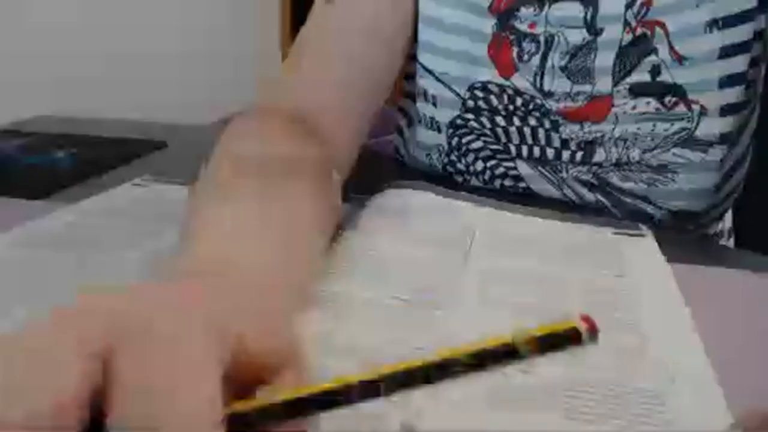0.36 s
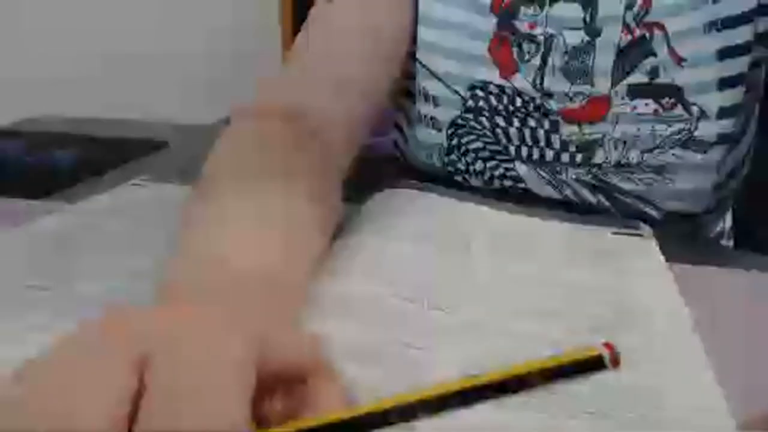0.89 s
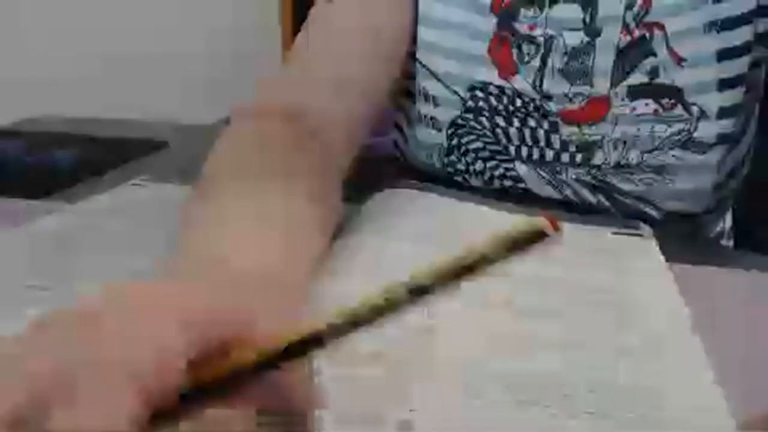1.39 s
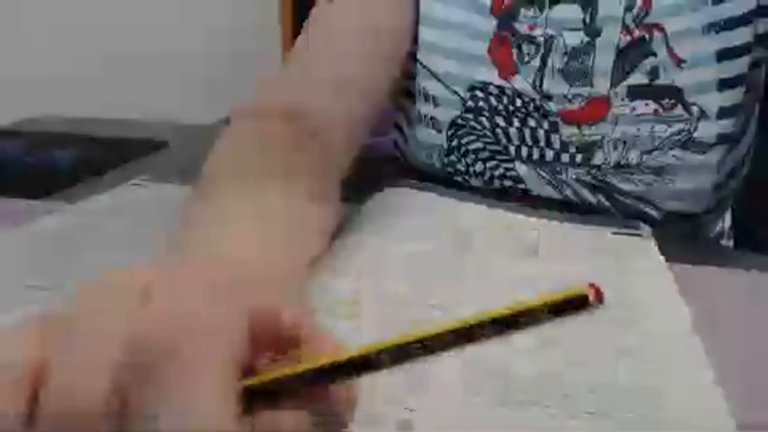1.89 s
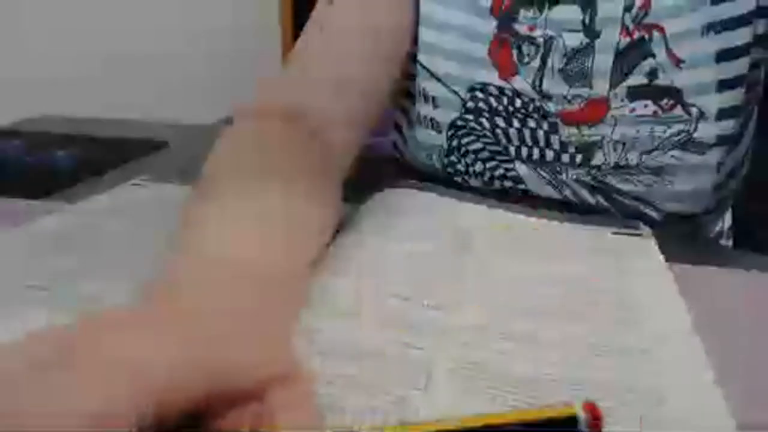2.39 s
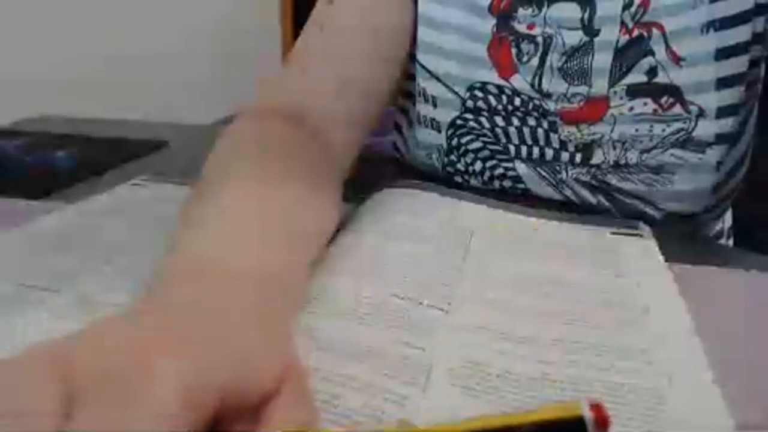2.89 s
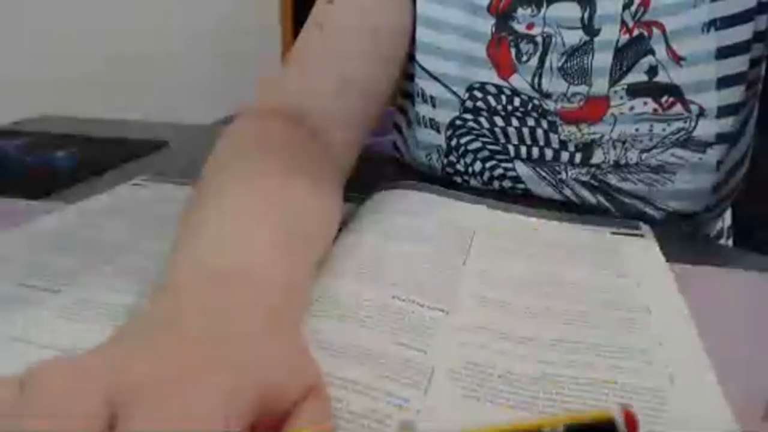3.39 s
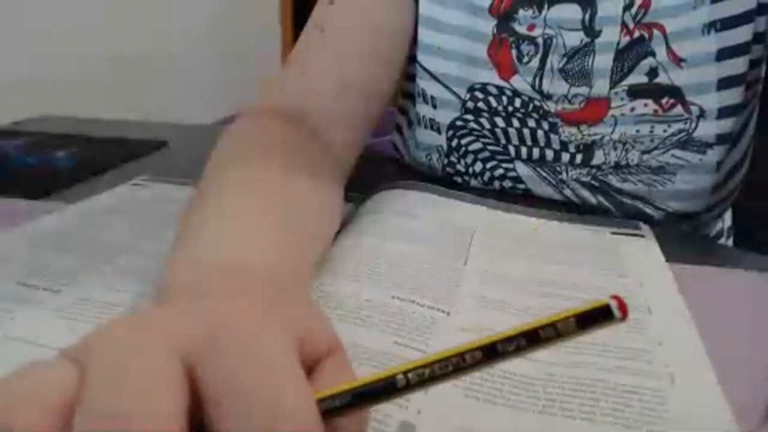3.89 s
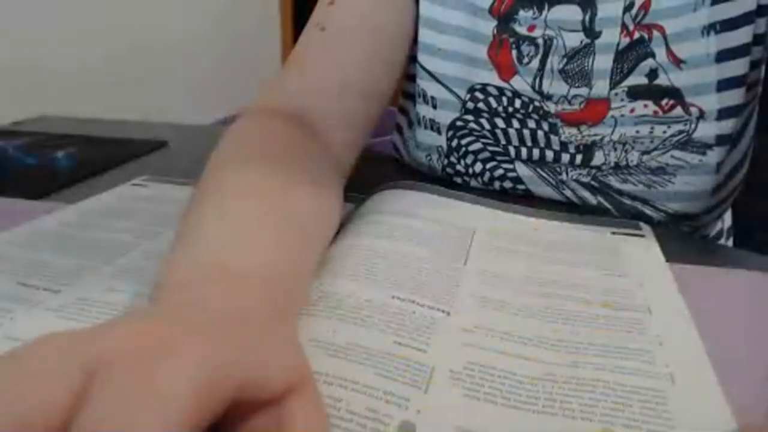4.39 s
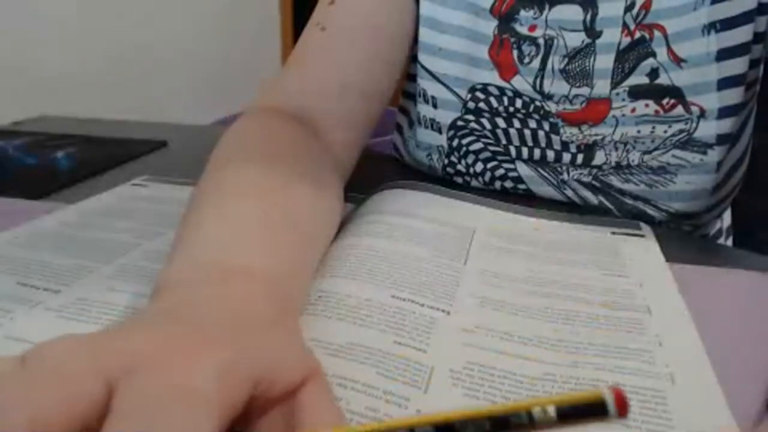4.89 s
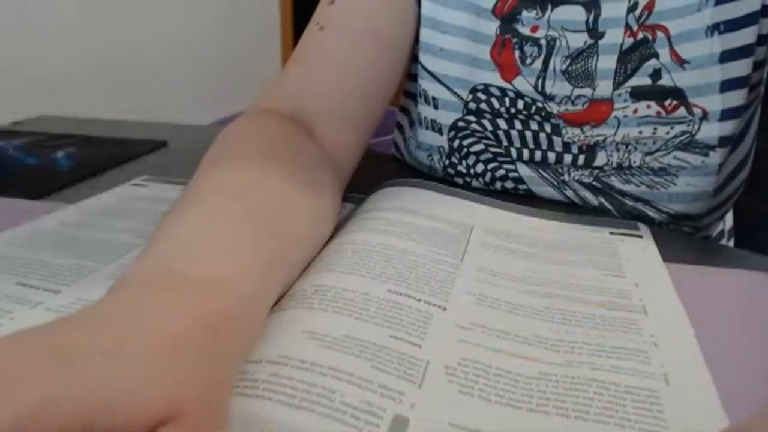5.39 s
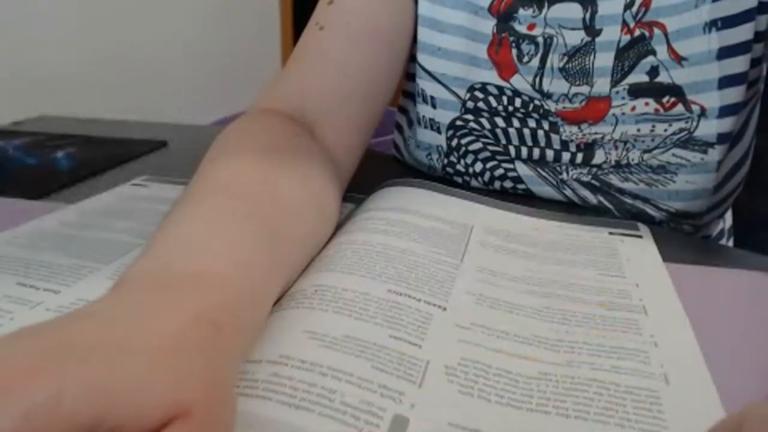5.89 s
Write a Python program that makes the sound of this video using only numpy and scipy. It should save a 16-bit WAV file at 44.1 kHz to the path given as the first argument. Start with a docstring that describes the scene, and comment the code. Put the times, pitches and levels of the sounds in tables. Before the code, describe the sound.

Quick bursts of hard plasticky clicks and rattles close to the microphone, dull desk thuds beneath, one brief dropout, then faint light ticks.

```python
"""A hand holding a pencil taps plastic keys in quick bursts, close to a small microphone on the same desk.
Each stroke is a cluster of clicks into the key body; the desk top booms, loose caps rustle, a small room answers.
At about 3 s the sound drops out for a moment and snaps back; a last strong burst follows.
Near 4.6 s a fingertip slides over a page with hiss and squeak; a faint thin whistle comes and goes.
The last keys are lighter. The desk hum of a resting arm and soft room hiss lie underneath."""
import sys
import numpy as np
from scipy import signal
from scipy.fft import rfft, irfft
from scipy.io import wavfile
from scipy.ndimage import uniform_filter1d

SR = 44100
rng = np.random.default_rng(int(sys.argv[2]) if len(sys.argv) > 2 else 0)


def linear_from_db(decibels):
    """Turn decibels (scalar or array-like) into linear amplitude factors; 0 gives 1."""
    return 10 ** (np.asarray(decibels, float) / 20)


def wav_out(sig):
    """Save sig, one row per channel (or a flat mono array), as 16-bit PCM at SR to the path in sys.argv[1]."""
    wavfile.write(sys.argv[1], SR, np.round(np.clip(np.atleast_2d(sig).T, -1, 1) * 32767).astype(np.int16))


N = 265482

# loose caps shaken by a stroke: start_s, level_db, t60_s (time to fall 60 dB),
# ring_hz (of the struck part), tilt_db_per_octave (brightness)
SHAKES = [(0.582, -41.5, 0.21, 3530, -1), (0.691, -49.5, 0.19, 2670, 1), (.791, -41.5, 0.32, 1150, 1.5),
          (.875, -52.5, 1.1, 2970, -2.5), (0.967, -38, 0.12, 1010, -4.5), (1.062, -35, 0.31, 1140, 3.5),
          (1.194, -57, 0.89, 1085, 3), (1.239, -42.5, .47, 940, -0.5), (1.335, -39.5, 0.43, 3080, -1),
          (1.415, -50, .74, 2770, -0.5), (1.497, -60, .22, 2920, -3), (1.606, -46.5, 0.42, 844, 0),
          (1.726, -32, .3, 1400, 1), (1.796, -41.5, 0.74, 2360, 3), (1.864, -39.5, .17, 1290, 1.5),
          (2.062, -34.5, .33, 2890, -0.5), (2.232, -31.5, 0.31, 1095, 1.5), (2.33, -41.5, .47, 2020, 2.5),
          (2.409, -30.5, 0.2, 2603, 0), (2.483, -41.5, 1, 2660, 0.5), (2.574, -35, 0.45, 2210, 0.5),
          (2.631, -37, .28, 3010, 1), (2.672, -42, .19, 3200, -1), (2.817, -32, .21, 3120, -0.5),
          (2.889, -51, 0.5, 1840, 2.5), (2.983, -34.5, 0.14, 1600, 1.5), (3.121, -59.5, 0.22, 3140, -2),
          (3.343, -55.5, 0.93, 2810, 0), (3.382, -58.5, 0.35, 1070, -0.5), (3.431, -61, 0.82, 1290, 0.5),
          (3.52, -45.5, .11, 1660, 0), (3.635, -34, 0.3, 1750, 1), (3.776, -46, 0.25, 3100, 4.5),
          (3.832, -52.5, 0.35, 2640, -5), (3.933, -35, 0.25, 1744, -0.5), (3.999, -39.5, .096, 3220, 1),
          (4.035, -46.5, 0.24, 2930, 0), (4.135, -77, .8, 1015, 3), (4.171, -38, 0.28, 2800, 0.5),
          (4.295, -42.5, 0.31, 1030, 0), (4.374, -52.5, .8, 1095, 0), (4.431, -63, 0.15, 1250, 5.5),
          (4.792, -62.5, 0.25, 1290, 2.5), (4.857, -64.5, 0.28, 1000, -1), (4.95, -72, .64, 1120, 1.5),
          (5.001, -56, 0.11, 1090, 15), (5.09, -60, 0.33, 976, 4.5), (5.129, -56.5, 0.19, 1160, 5),
          (5.252, -76, .3, 1110, 4.5), (5.366, -68, .54, 980, 1), (5.449, -54.5, 0.26, 3830, 8),
          (5.545, -61.5, 0.21, 1100, 1), (5.623, -60, 0.49, 1115, 3), (5.684, -52.5, .15, 1087, 6.5),
          (5.947, -57.5, 0.13, 1214, 0.5)]


def rms_one(x):
    """Scale to rms 1."""
    return x / np.sqrt(np.mean(x ** 2) + 1e-20)


def in_time(rows):
    """Columns of a table that starts with the time, drawn as straight lines sample by sample."""
    s, *columns = np.transpose(rows)
    return [np.interp(np.arange(N) / SR, s, c) for c in columns]


def resonate(x, hz, width_hz):
    """Two-pole resonance, like one mode of a struck body, with gain 1 on top."""
    r = np.exp(-np.pi * width_hz / SR)
    feedback = [1, -2 * r * np.cos(2 * np.pi * hz / SR), r * r]
    return signal.lfilter([(1 - r * r) / 2, 0, (r * r - 1) / 2], feedback, x + 1e-18)


def narrow_noise(hz, width_hz):
    """Noise twice through one resonance: a husky, unsteady pitch."""
    return rms_one(resonate(resonate(rng.standard_normal(N), hz, width_hz), hz, width_hz))


def coloured(x, spectrum, tilt_db=0):
    """Third-octave bank that gives two rows of noise a spectrum; the tilt (dB per octave) turns about 2 kHz."""
    hz_points, db_points = np.transpose(spectrum)
    edges = 25 * 2 ** np.arange(0, 8.7, 1 / 3)
    out = 0
    for k, (low, high) in enumerate(zip(edges, edges[1:])):
        hz = np.sqrt(low * high)
        band_filter = signal.butter(2, [low, high], "band", fs=SR, output="sos")
        band = signal.sosfilt(band_filter, x[k % 2])      # neighbouring bands use different rows
        band_db = np.interp(np.log(hz), np.log(hz_points), db_points)
        out = out + band * linear_from_db(band_db + tilt_db * np.log2(hz / 2000))
    return out


def room_hiss():
    """Steady noise of the room, shaped by a fixed spectrum."""
    # pitch_hz, level_db (per Hz, before the whole is scaled)
    hiss_spectrum = [(15, -39), (25, -6), (48, 2), (168, -3), (204, -1), (254, -11), (316, 4), (357, -6.5),
                     (540, -15), (1400, -19.5), (2700, -30.5), (4190, -30), (8500, -40), (11000, -76),
                     (18700, -120)]
    level_db = -68
    return linear_from_db(level_db) * rms_one(coloured(rng.standard_normal((2, N)), hiss_spectrum))


def desk():
    """Each low mode is a narrow wavering tone that builds up to every blow and dies away to the hum of the arm."""
    # blows through the desk top: fullest_s, first_mode_db, second_mode_db, third_mode_db,
    # t60_s (until the hand damps it)
    blows = [(0.629, -38, -37.5, -54.5, 0.13), (.755, -50, -55.5, -61, .2), (.856, -43, -37, -46.5, 0.27),
             (.915, -54, -36, -43, 0.11), (.97, -53, -44, -52, .2), (1.04, -53.5, -51.5, -60.5, .15),
             (1.098, -38.5, -37, -42.5, 0.086), (1.155, -45.5, -61, -64.5, 0.061),
             (1.24, -70.5, -62.5, -62.5, .15), (1.311, -50.5, -37, -56.5, 0.24),
             (1.374, -50, -39, -51.5, 0.21), (1.445, -53, -36.5, -61, 0.11), (1.679, -56, -45.5, -55, 0.17),
             (1.772, -42.5, -34, -42, 0.16), (1.84, -42.5, -44, -52, 0.2), (1.904, -48.5, -43, -55.5, 0.11),
             (1.971, -53.5, -55, -63.5, 0.18), (2.102, -44.5, -25.5, -40, 0.23),
             (2.2, -52.5, -44.5, -63, 0.26), (2.278, -36, -32.5, -45.5, 0.17),
             (2.364, -38.5, -38.5, -51.5, .15), (2.445, -47, -25, -42, 0.18),
             (2.515, -51.5, -36.5, -48, 0.15), (2.593, -42, -28, -41.5, 0.1), (2.615, -36.5, -43, -37, 0.1),
             (2.66, -40, -52.5, -50.5, .15), (2.734, -54.5, -40, -54, 0.067),
             (2.836, -56.5, -39, -47, 0.23), (2.876, -34.5, -42.5, -44, 0.11),
             (2.93, -43, -50.5, -57.5, 0.098), (3.0, -59, -54.5, -53.5, 0.14), (3.14, -66, -49.5, -64, .15),
             (3.404, -57, -42, -53, 0.36), (3.56, -54.5, -61, -58, 0.17),
             (3.662, -45.5, -42.5, -41.5, 0.078), (3.73, -59.5, -56.5, -51, .2),
             (3.845, -48, -47, -51.5, .15), (3.905, -47.5, -39, -50.5, 0.21),
             (3.973, -40, -38.5, -36, 0.14), (4.044, -52, -38, -44, 0.1), (4.115, -64, -52, -55.5, 0.067),
             (4.21, -50, -33, -47.5, 0.16), (4.361, -58, -35, -42.5, 0.14),
             (4.472, -47.5, -43.5, -62, 0.19), (4.87, -58.5, -63, -67.5, 0.37), (5.04, -61, -59, -71, 0.13),
             (4.915, -61, -65, -60, 0.13), (5.151, -58, -60, -60, 0.22), (5.294, -68, -62, -70.5, 0.22),
             (5.57, -66, -67, -60.5, 0.17), (5.85, -72, -84, -63.5, 0.43), (6.02, -69, -46.5, -62.5, 0.21)]
    # modes of the desk top: pitch_hz, width_hz (of each of two passes)
    desk_modes = [(61, 16), (118.5, 7), (195, 51)]
    # build-up of each mode: rise_db_per_s
    rises = [398.5, 547, 449.5]
    # how long each mode stays at full swing: hold_s
    holds = [0.01, 0.014, 0.0053]
    # hum kept up by the resting arm: time_s, first_mode_db
    arm = [(0, -67), (.55, -80), (.9, -68.5), (3, -65.5), (3.3, -60.5), (4.6, -60.5), (5.2, -67),
           (5.4, -70.5), (5.7, -65), (6.02, -64)]
    # second and third mode of that hum against the first: level_db
    arm_upper = [-14.5, -15.5]

    s, *peak_db, t60 = np.transpose(blows)[:, :, None]
    steps = np.arange(0, N + 64, 64) / SR
    arm_db = in_time(arm)[0]
    out = 0
    settings = zip(desk_modes, peak_db, rises, holds, [0, *arm_upper])
    for (hz, width_hz), top_db, rise, hold, lower_db in settings:
        before = np.minimum(steps - s + hold / 2, 0)
        after = np.maximum(steps - s - hold / 2, 0)
        swing_db = top_db + rise * before - 60 * after / np.maximum(t60, 0.03)
        blow_power = np.sum(linear_from_db(2 * swing_db), axis=0)
        power = np.interp(np.arange(N) / SR, steps, blow_power) + linear_from_db(2 * (arm_db + lower_db))
        noise = rng.standard_normal(N + SR)      # one second extra to settle
        tone = resonate(resonate(noise, hz, width_hz), hz, width_hz)
        steady_tone = np.cos(np.angle(signal.hilbert(tone)))[SR:]      # keeps the phase, evens out the level
        out = out + np.sqrt(2 * power) * steady_tone
    return out


def whistle():
    """A faint thin whistle of narrow noise that comes and goes."""
    # time_s, level_db
    whistle_level = [(4.74, -100), (4.77, -70), (4.81, -89.5), (4.89, -87), (4.92, -84.5), (4.95, -73),
                     (4.99, -100)]
    return linear_from_db(in_time(whistle_level)[0]) * narrow_noise(hz=3450, width_hz=120)


def slide():
    """A fingertip on the page: smooth friction hiss with a husky squeak on two resonances."""
    # time_s, hiss_db, squeak_db
    slide_level = [(4.56, -94, -97.5), (4.6, -79, -70.5), (4.66, -64, -72), (4.72, -72.5, -83),
                   (4.8, -99.5, -96)]
    # pitch_hz, level_db (per Hz, before the hiss is scaled)
    hiss_spectrum = [(350, -44), (600, -15.5), (1280, -4.5), (2000, -17), (2430, -8.5), (5970, -13),
                     (8000, -30), (10400, -55), (17600, -120)]
    # pitch_hz, width_hz (of each of two passes), level_db (within the squeak)
    squeak_modes = [(2310, 92, 4.5), (7200, 350, -6)]

    hiss_db, squeak_db = in_time(slide_level)
    hiss = rms_one(coloured(rng.standard_normal((2, N)), hiss_spectrum))
    squeak = sum(linear_from_db(db) * narrow_noise(hz, width_hz) for hz, width_hz, db in squeak_modes)
    return linear_from_db(hiss_db) * hiss + linear_from_db(squeak_db) * squeak


def shake_db(t):
    """Rustle level, which starts afresh at each stroke and dies away; also the index of that stroke."""
    s, start_db, t60, *_ = np.transpose(SHAKES)
    last = np.clip(np.searchsorted(s, t) - 1, 0, None)
    dying_db = start_db[last] - 60 * (t - s[last]) / np.maximum(t60[last], 0.05)
    return np.where(t > s[0], dying_db, -200), last


def rustle():
    """Dense small ticks: each stroke shakes the loose caps afresh; they grow duller and die away until the next."""
    # pitch_hz, level_db (per Hz, before the whole is scaled)
    rustle_spectrum = [(150, -35.5), (250, -4), (302, -4), (597, 3), (710, -10), (1100, 2), (1550, -7.5),
                       (1750, -2), (3120, -11), (6920, -29), (8000, -46.5), (10400, -75.5), (17600, -120)]
    grains_per_s, spread_db = 13000.0, 6.0
    flicker_db, flicker_hz = -0.5, 60.0
    swell_ms, darken_db_per_octave_s = 2.4, -9.5
    ring_db, ring_width_hz = -7.5, 57.0      # ring of the struck part against the rustle

    s, *_, ring_hz, tilt_db = np.transpose(SHAKES)
    t = np.arange(N) / SR
    level_db, last = shake_db(t)
    age = np.clip(t - s[last], 0, 0.3)      # the darkening stops after 0.3 s
    swell = 1000 / (swell_ms * SR)
    level = signal.lfilter([swell], [1, swell - 1], linear_from_db(level_db))      # softens each start

    sizes = linear_from_db(spread_db * np.minimum(rng.exponential(1, (2, N)), 3)) * rng.choice([-1, 1], (2, N))
    ticks = (rng.random((2, N)) < grains_per_s / SR) * sizes
    slow_filter = signal.butter(2, flicker_hz, fs=SR, output="sos")
    clumps = rms_one(signal.sosfilt(slow_filter, rng.standard_normal(N)))

    plain = np.sqrt(np.mean(coloured(ticks, rustle_spectrum) ** 2))
    sound = coloured(ticks, rustle_spectrum, tilt_db[last] + darken_db_per_octave_s * age) / plain
    for k in range(len(s)):      # the part that was struck keeps sounding its own resonance
        now = last == k
        sound[now] += linear_from_db(ring_db) * rms_one(resonate(ticks[0, now], ring_hz[k], ring_width_hz))
    return level * linear_from_db(flicker_db * clumps) * sound


def strays():
    """Stray ticks: small contacts at random moments, as strong as the caps are shaken just then."""
    # over the rustle, for clack, case ring and snap: level_db
    over_rustle = [6.5, 8.5, -4.5]
    ticks_per_s, spread_db, length_ms = 14, 3.5, 1.5
    count = int(ticks_per_s * N / SR)
    s = (np.arange(count) + rng.random(count)) / ticks_per_s
    chance_db = spread_db * rng.standard_normal((count, 3))
    level_db = shake_db(s)[0][:, None] + over_rustle + chance_db
    return np.column_stack([s, level_db, np.full(count, length_ms)])


def keys():
    """A contact is a sudden, short burst of tiny impacts; every contact draws its own tuning and mode strengths."""
    # key contacts: start_s, clack_db, case_ring_db, snap_db, length_ms (kept within 0.5 to 15 below)
    contacts = [(0.5815, -19, -27, -26, 7.4), (0.7046, -39.5, -40, -70, 11),
                (0.7916, -20.5, -25, -19.5, 3.8), (0.8245, -33, -32, -40, 1),
                (0.9112, -36, -39, -43.5, 0.62), (0.9383, -38.5, -46, -50, 8.5),
                (0.9682, -24.5, -17.5, -30, 2.2), (1.061, -13.5, -19, -26, 8),
                (1.0833, -24, -29, -36, 0.55), (1.1938, -45.5, -45.5, -71, 1.4), (1.2382, -16, -19, -27, 2),
                (1.2871, -35, -41.5, -55.5, 1.4), (1.3355, -17.5, -16.5, -25.5, 3.9),
                (1.388, -32.5, -40, -60, 1.4), (1.4138, -30, -31, -49, 1.3), (1.4484, -46, -36.5, -62, 1.5),
                (1.4698, -40.5, -34, -62, 2.2), (1.4968, -34, -43, -62.5, 7.4),
                (1.6048, -25.5, -24.5, -37, 1.5), (1.6427, -29.5, -29, -38.5, 7.1),
                (1.728, -17.5, -24, -23, .73), (1.7331, -18.5, -13.5, -22.5, 4.1),
                (1.7584, -30.5, -28.5, -41, 3.5), (1.7956, -33.5, -29.5, -42, 10.4),
                (1.8205, -30, -33.5, -45.5, 7.6), (1.8617, -28.5, -28, -62, 1.8),
                (1.8762, -24.5, -28, -51, 9.7), (2.0607, -10.5, -10, -15.5, 5.7),
                (2.2291, -13, -23.5, -24.5, 2.8), (2.2333, -17, -16.5, -45, 4),
                (2.3302, -21.5, -27, -36, 0.63), (2.339, -17.5, -23, -32.5, 1.1),
                (2.4114, -10.5, -26.5, -40, 2.5), (2.4832, -19.5, -28, -27, 3.2),
                (2.4894, -19, -19.5, -33.5, 2.6), (2.5167, -34, -37, -49.5, 7.9),
                (2.5743, -12, -21, -26, 2.4), (2.6, -37, -37, -42, 10), (2.6287, -21, -24, -41.5, 7),
                (2.6517, -38, -36, -56, 1.4), (2.6882, -34.5, -34.5, -57.5, 7),
                (2.8162, -8.5, -26, -14, 1.7), (2.8203, -13, -30.5, -17, 2.5),
                (2.85, -29, -32.5, -35.5, 5.5), (2.8894, -29.5, -43.5, -46.5, 2.8),
                (2.9864, -27, -33.5, -47, 7.7), (3.1193, -62, -51.5, -72, 7.4),
                (3.3422, -44, -57.5, -47.5, 8.6), (3.3824, -45.5, -42.5, -56, 9),
                (3.4294, -59.5, -49.5, -69, 3.8), (3.4686, -52.5, -54, -59.5, 1.8),
                (3.4935, -52, -46.5, -59, 21), (3.5206, -39.5, -33, -45, 7),
                (3.6373, -12.5, -18, -25, 3.75), (3.7717, -44, -37.5, -55, 7.5), (3.782, -39, -34, -51, 11),
                (3.7982, -29, -31, -41.5, 6.4), (3.8321, -32, -31.5, -40, 4.4),
                (3.8534, -35.5, -36.5, -52.5, 3.5), (3.9366, -35, -24, -30, 4.9),
                (3.9978, -37, -36, -48, 4.3), (4.0128, -31, -30, -42, 1.5),
                (4.0185, -22, -31.5, -37.5, 2.8), (4.0375, -32, -35, -49, 1.7),
                (4.0589, -40, -44.5, -52, 1.8), (4.1355, -68, -52, -72, 1.2),
                (4.1732, -15.5, -17, -28.5, 0.84), (4.2943, -35.5, -29.5, -42.5, 1.2),
                (4.3164, -27.5, -20.5, -43.5, 4), (4.3359, -32, -31, -48, 9),
                (4.3741, -40.5, -40.5, -65, 5.4), (4.4327, -37, -29, -48.5, 3.1),
                (4.4392, -30, -38.5, -51.5, 1.64), (4.7907, -55.5, -41.5, -64.5, 8.5),
                (4.8568, -53, -40, -66, 2.8), (4.89, -67, -51, -72.5, 11), (4.9504, -64, -53.5, -72, 4.3),
                (4.9626, -59, -51, -71.5, 9.8), (4.9883, -52, -41.5, -49.5, 9.8),
                (5.0032, -31, -30.5, -35, 10.2), (5.0882, -47, -55, -58, 4.2), (5.1279, -41, -31, -50, 2.4),
                (5.1525, -57, -47, -64.5, 3), (5.2197, -62, -51.5, -70, 7.4), (5.239, -59, -53, -64.5, 7.9),
                (5.2507, -50.5, -34, -51.5, 3), (5.3646, -61, -41.5, -66.5, 8.6),
                (5.4492, -40, -37, -38.5, 8.9), (5.4647, -46.5, -46.5, -43, 8.9),
                (5.5435, -50, -38.5, -59, 7.6), (5.5848, -69.5, -52, -79, 3.8),
                (5.622, -64.5, -43.5, -64, 5.1), (5.6413, -57.5, -40, -57, 7.3),
                (5.6821, -43.5, -38.5, -49, 4.9), (5.9447, -60.5, -45.5, -59.5, 6.3),
                (5.9691, -60.5, -44.5, -60, 4.5)]
    # resonances in four groups (clack, case ring, snap, thud): pitch_hz, width_hz (of each of two passes),
    # level_db (within the group)
    key_body = [
        [(1695, 570, 3.5), (2078, 840, -1), (2358, 350, 4), (2943, 402, 2.5), (3530, 310, -5.5)],
        [(936, 230, -6.5), (1099.3, 212, 1.5), (1290, 250, -4)],
        [(4374, 840, 7.5), (5263, 1290, 0), (5980, 4400, -2.5), (6580, 490, -16)],
        [(342, 43, -6), (465.4, 62, 5), (593.5, 300, -1), (826, 310, 0.5)],
    ]
    # spread of tuning for each group, the shared case ring varies least: share
    key_detune = [0.055, 0.025, 0.043, 0.042]
    # thud of a full-scale contact, weaker on the last, lighter keys: time_s, level_db
    thud_level = [(0, -23.5), (1.1, -22.5), (1.4, -28), (2.7, -26.5), (3.0, -20.5), (3.7, -26),
                  (3.85, -18.5), (4.4, -19), (4.5, -39), (6.02, -43)]
    thud_per_clack, thud_per_case = 0.38, 0.25      # dB of thud per dB
    clicks_per_ms, spread_db, first_db = 6.0, 4.5, 15.5
    rise_ms, fall_ms = 0.97, 0.93
    touch_db, touch_ms = -24, 12.0
    settle_db, settle_ms = -15, 8.5
    mode_chance_db = 3.0
    struck_part_db_per_octave = 5.5      # favours the resonances nearest to the ring of the struck part

    rows = np.vstack([contacts, strays()])
    s, clack_db, case_db, snap_db, length_ms = np.transpose(rows)[:, :, None]
    thud_db = np.interp(s, *np.transpose(thud_level)) + thud_per_clack * clack_db + thud_per_case * case_db
    lead, size = 800, 4096      # samples before the contact, samples in all
    t_ms = (np.arange(size) - lead) * 1000 / SR
    length_ms = np.clip(length_ms, 0.5, 15)

    draws = rng.random((len(s), 3, size))
    hit = draws[:, 0] < clicks_per_ms * 1000 / SR
    impacts = hit * linear_from_db(-spread_db * np.log(draws[:, 1] + 0.015)) * np.sign(draws[:, 2] - 0.5)
    impacts[:, lead] = linear_from_db(first_db)      # the key bottoms out with one firm knock
    blow = np.exp(np.minimum(t_ms, 0) / rise_ms - np.maximum(t_ms - length_ms, 0) / fall_ms)
    # the finger lands before the key bottoms out
    touch = linear_from_db(touch_db) * np.clip(1 + t_ms / touch_ms, 0, 1) * (t_ms < 0)
    # the cap rattles to rest
    settle = linear_from_db(settle_db) * (t_ms > 0) * np.exp(-np.maximum(t_ms, 0) / settle_ms)
    force = rfft(impacts * (blow + touch + settle))

    struck_hz = np.array(SHAKES)[shake_db(s + 0.005)[1], 3]
    delay = np.exp(-2j * np.pi * np.arange(size // 2 + 1) / size)      # one sample, as a spectrum
    chance = iter(rng.standard_normal((len(s), 40)).T[:, :, None])
    sound = 0
    for modes, detune, group_db in zip(key_body, key_detune, (clack_db, case_db, snap_db, thud_db)):
        body = 0
        for hz, width_hz, mode_db in modes:
            r = np.exp(-np.pi * width_hz / SR)
            w = 2 * np.pi * hz * (1 + detune * next(chance)) / SR
            feedback = 1 - 2 * r * np.cos(w) * delay + r * r * delay * delay
            resonance = (1 - r * r) / 2 * (1 - delay * delay) / feedback
            away_db = struck_part_db_per_octave * np.abs(np.log2(hz / struck_hz))
            strength = linear_from_db(mode_db + mode_chance_db * next(chance) - away_db)
            body = body + strength * resonance ** 2      # twice: steep skirts
        rung = irfft(force * body)
        mean_power = uniform_filter1d(rung ** 2, size=110)
        height = np.sqrt(2 * mean_power.max(axis=1, keepdims=True))
        sound = sound + linear_from_db(group_db) * rung / height
    at = np.clip(np.round(s * SR).astype(int) - lead + np.arange(size), 0, N)
    return np.bincount(at.ravel(), sound.ravel(), N + 1)[:N]


def room(x):
    """Echoes as dying noise: a quick part from desk and near wall, a longer, duller part from the room."""
    early_t60_s, early_db = 0.074, -11.5
    late_t60_s, late_db, wall_cut_hz = 0.3, -21.5, 9400
    t = np.arange(SR // 2) / SR
    noise = rng.standard_normal((2, len(t))) * np.clip(t / 0.0096, 0, 1)      # fades in over 9.6 ms
    early = noise[0] * linear_from_db(-60 * t / early_t60_s)
    wall_filter = signal.butter(1, wall_cut_hz, fs=SR, output="sos")
    late = signal.sosfilt(wall_filter, noise[1]) * linear_from_db(-60 * t / late_t60_s)
    echoes = linear_from_db(early_db) * rms_one(early) + linear_from_db(late_db) * rms_one(late)
    return signal.oaconvolve(x, echoes / np.sqrt(len(t)))[:N]


def scene():
    """Room hiss, desk, whistle, slide, rustle, and the keys with their room."""
    strokes = keys()
    background = room_hiss() + desk() + whistle()
    return (background + slide() + rustle() + strokes + room(strokes))[None]


def low_pass(x):
    """Removes everything above the highest recorded frequency."""
    return signal.sosfilt(signal.butter(12, 9250, fs=SR, output="sos"), x)


def record(dry):
    """A narrow-band microphone chain that rounds peaks, fades out once and snaps back, with converter noise."""
    # the moment without sound, then a return to a higher level: time_s, level_db
    dropout = [(3.005, 1.5), (3.03, -12.5), (3.09, -48), (3.113, -68), (3.119, 5.5)]
    overload, high_cut_hz, low_cut_hz = 0.95, 6550, 41.76
    converter_db = -94.5
    rounded = overload * np.tanh(dry / overload)
    treble_filter = signal.cheby1(5, 1, high_cut_hz, fs=SR, output="sos")
    bass_filter = signal.butter(4, low_cut_hz, "high", fs=SR, output="sos")
    narrow = signal.sosfilt(bass_filter, signal.sosfilt(treble_filter, rounded))
    converter_noise = linear_from_db(converter_db) * rng.standard_normal(dry.shape)
    mix = narrow * linear_from_db(in_time(dropout)[0]) + converter_noise
    return low_pass(mix)


dry = scene()
out = record(dry)
wav_out(out)
```